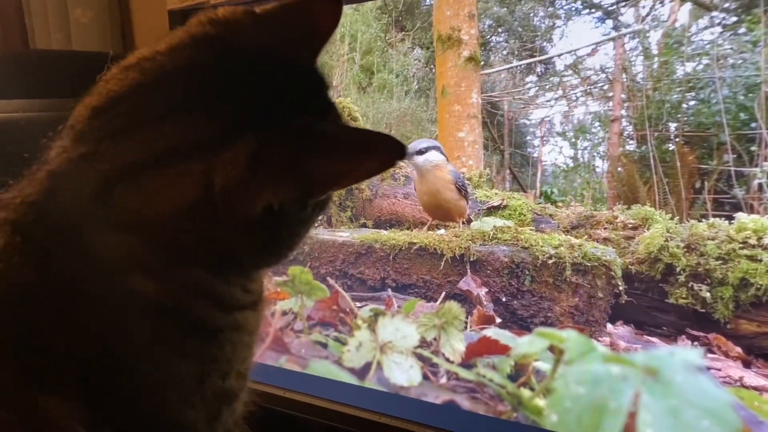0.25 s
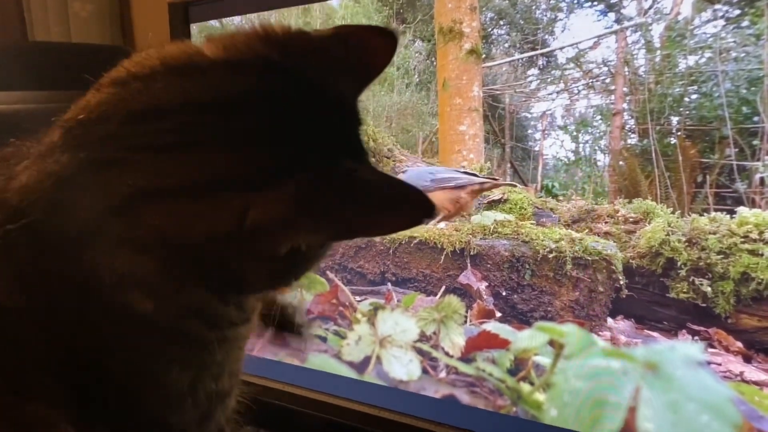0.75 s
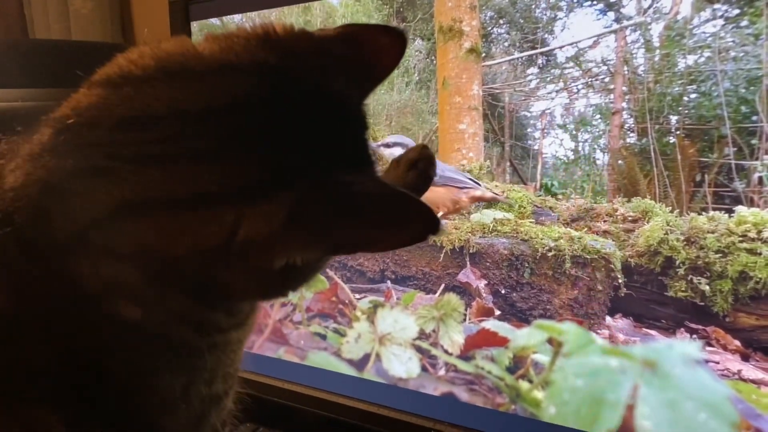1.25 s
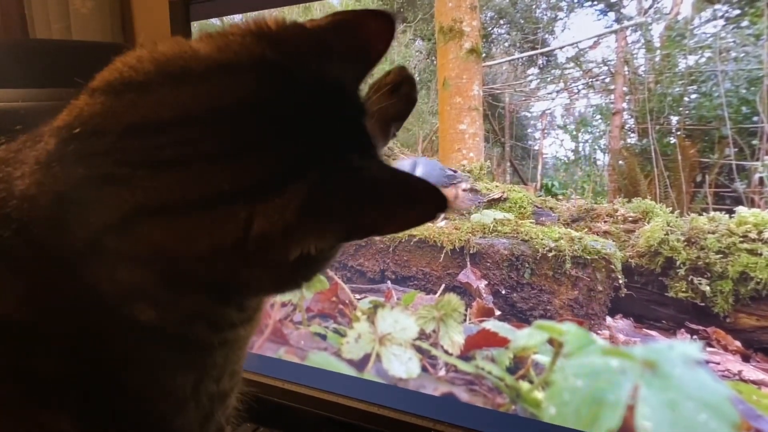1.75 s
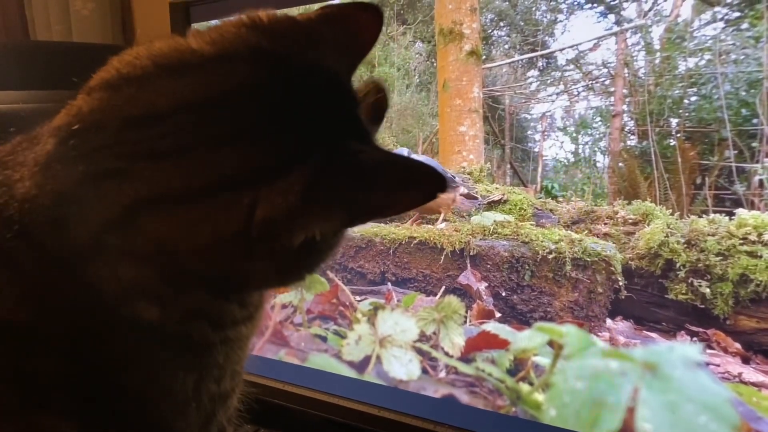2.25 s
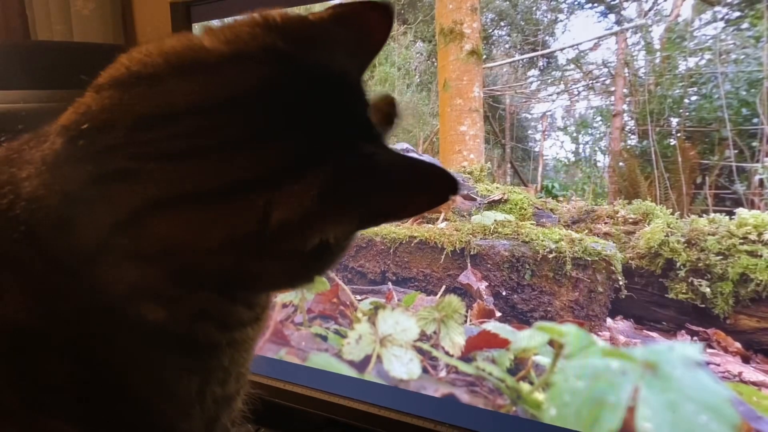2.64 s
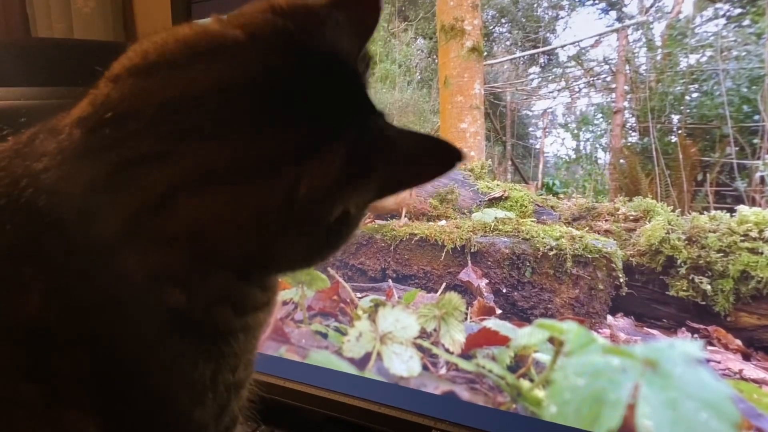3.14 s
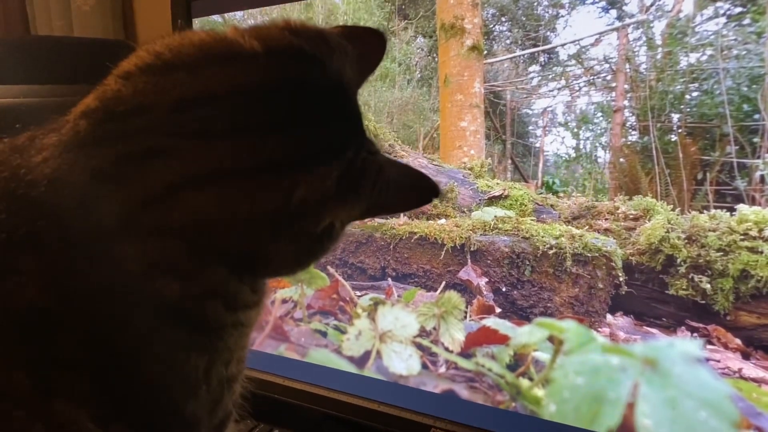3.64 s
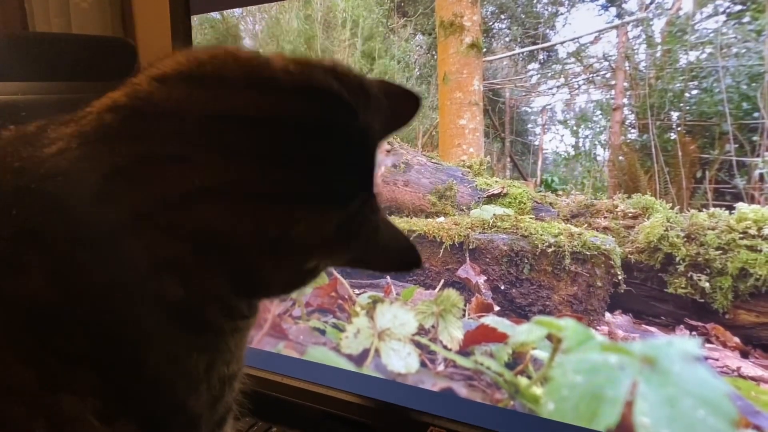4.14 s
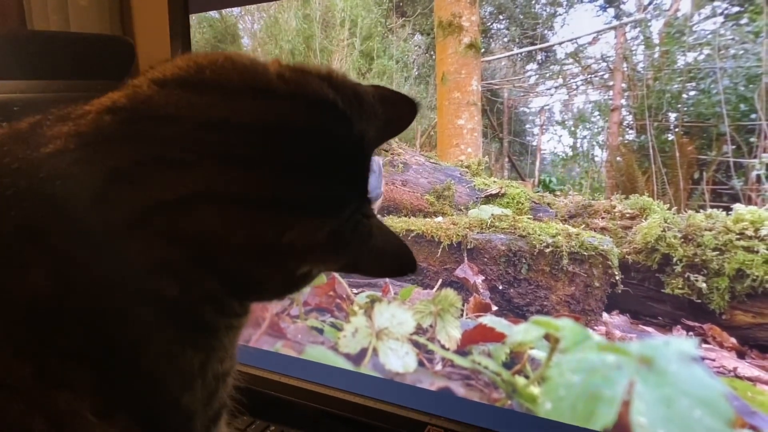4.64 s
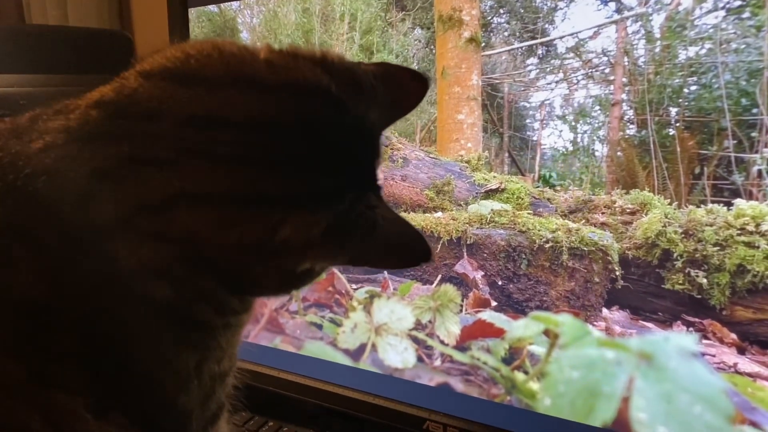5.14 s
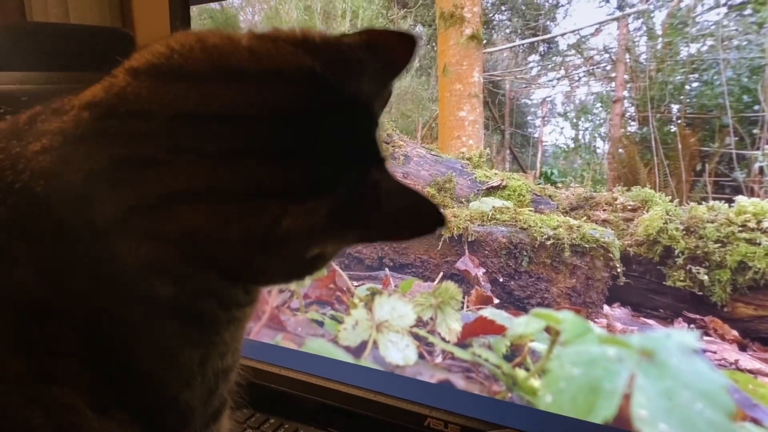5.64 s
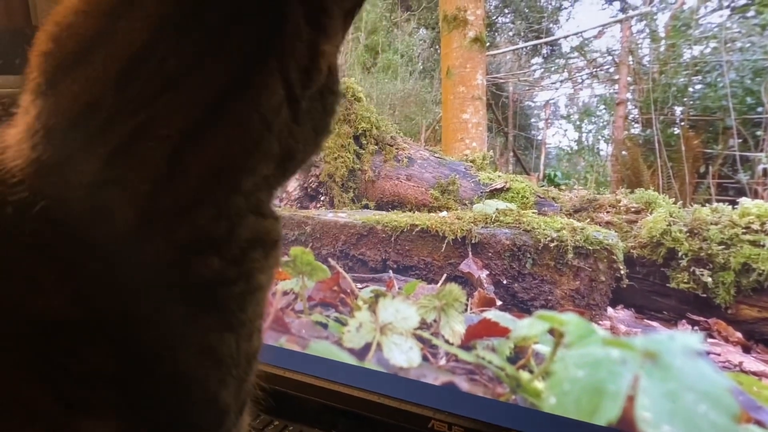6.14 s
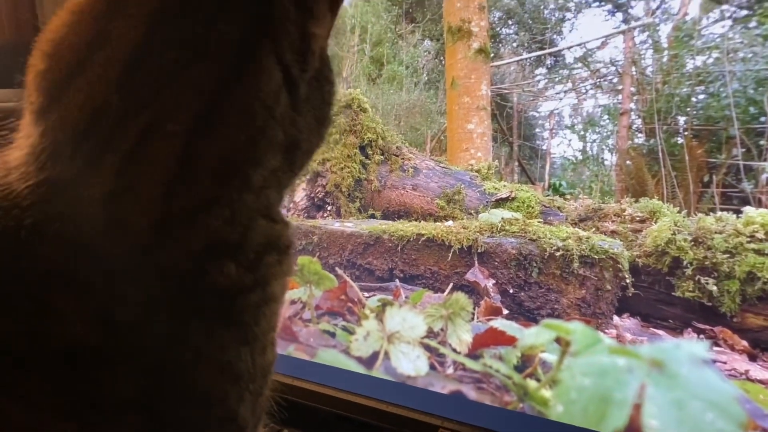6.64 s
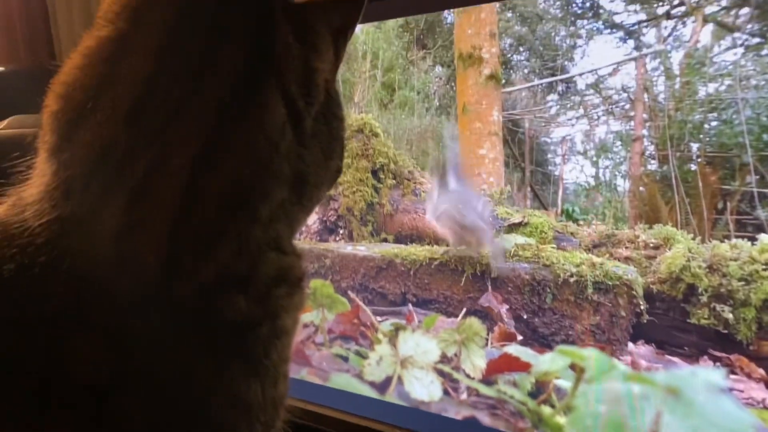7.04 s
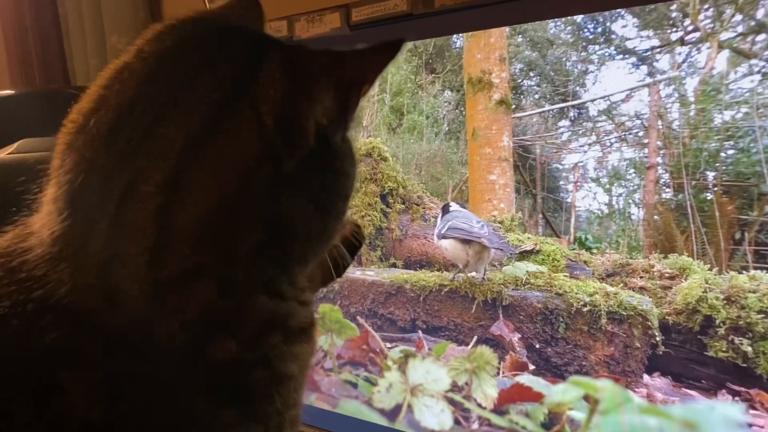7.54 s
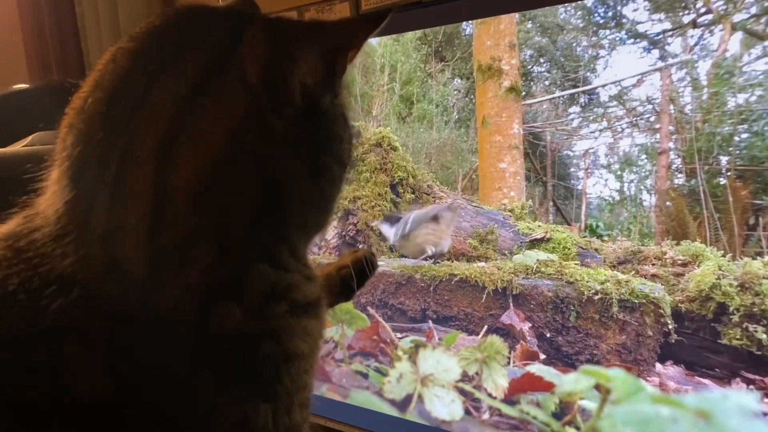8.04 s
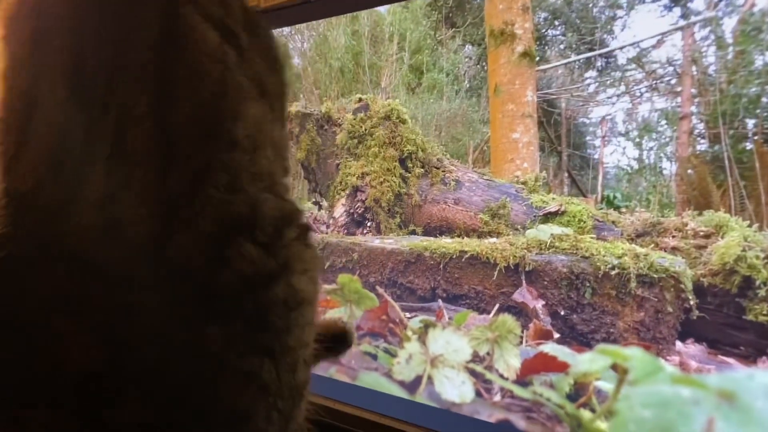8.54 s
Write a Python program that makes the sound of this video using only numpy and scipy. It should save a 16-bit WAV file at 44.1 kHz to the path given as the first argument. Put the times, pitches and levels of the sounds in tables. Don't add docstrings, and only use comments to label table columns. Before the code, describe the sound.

Paw taps click on a screen over low room hum and soft garden hiss, then bird knocks, fluttering wings, low bumps and thin chirps.

```python
import sys
import numpy as np
from scipy import signal
from scipy.fft import rfft, irfft, next_fast_len
from scipy.io import wavfile
from scipy.ndimage import uniform_filter1d

SR = 44100
rng = np.random.default_rng(int(sys.argv[2]) if len(sys.argv) > 2 else 0)


def amplitude_ratio(level_db):
    exponent = np.asarray(level_db, float) / 20
    return 10 ** exponent


def store_pcm(level_fs):
    pcm = np.round(np.clip(level_fs, -1, 1) * 32767).astype(np.int16)
    wavfile.write(sys.argv[1], SR, np.atleast_2d(pcm).T)


N = 387286
SIZE = next_fast_len(N + SR)
HZ = np.arange(SIZE // 2 + 1) * SR / SIZE + 1e-3
TIME = np.arange(N) / SR


def on_hz(table, column):
    table = np.array(table, float)
    return np.interp(np.log(HZ), np.log(table[:, 0]), table[:, column])


def on_time(table, column):
    table = np.array(table, float)
    return np.interp(TIME, table[:, 0], table[:, column])


def shape(x, gain):
    return irfft(rfft(x, SIZE) * gain, SIZE)[..., :N]


def band(lo_hz, hi_hz, order=2):
    low_cut = 1 + (lo_hz / HZ) ** (2 * order)
    high_cut = 1 + (HZ / hi_hz) ** (2 * order)
    return 1 / np.sqrt(low_cut * high_cut)


def mode(hz, width):
    return 1j * HZ * width / (hz ** 2 - HZ ** 2 + 1j * HZ * width)


def hiss(gain, channels=1):
    x = shape(rng.standard_normal((channels, N)), gain)
    return x / x.std()


def walk(rate):
    k = int(SR / rate)
    levels = np.repeat(rng.standard_normal(N // k + 1), k)
    return 1.1 * uniform_filter1d(uniform_filter1d(levels, k), k)[:N]


def add(out, s, x):
    i = int(s * SR)
    out[i:i + len(x)] += x[:N - i]


def ring(x, hz, width):
    y = signal.lfilter(*signal.iirpeak(hz, hz / width, SR), x)
    return y / np.abs(y).max()


# start_s [s], level_db [dB]
AIR_SWELL = [(0, -63), (1.27, -65), (1.51, -62.5), (1.66, -59.5), (2.1, -63.5), (3.81, -64), (4.25, -63),
             (4.6, -64), (5.43, -64), (6.14, -59), (6.31, -62), (6.8, -58), (6.94, -60.5), (7.29, -61),
             (7.8, -64), (8.46, -60.5), (8.61, -51), (8.78, -58)]
# pitch_hz [Hz], level_db [dB]
AIR_TONE = [(350, -34), (600, 1), (788, -20), (855, -5.5), (1180, -5.5), (1320, -4), (1600, 0), (1990, -5),
            (2640, -7.5), (3770, -11), (4090, -8.5), (4370, -12), (8290, -24.5), (13900, -39.5),
            (15500, -35)]


def garden_air():
    out, tone = 0, amplitude_ratio(on_hz(AIR_TONE, 1))
    low_db = on_time(AIR_SWELL, 1)
    high_db = 2 + 0.8 * (low_db + 62.5)
    for hz in 640 * 2 ** np.arange(0, 4.8, .7):
        share = np.clip(np.log2(hz / 2200) / 0.25, 0, 1) * np.clip(hz / 3000, 0, 1)
        reach = np.clip(np.log2(hz / 500) / 0.74, 0, 1)
        swell_db = reach * ((1 - share) * (low_db + 67.5) + share * high_db)
        gain = tone * band(hz / 2 ** 0.5, hz * 2 ** 0.57, order=3)
        out = out + amplitude_ratio(swell_db + 4.34 * walk(8.9)) * shape(rng.standard_normal(N), gain)
    return out * amplitude_ratio(-55.5)


# pitch_hz [Hz], level_db [dB]
DRONE_TONE = [(30, -43.5), (48, -8), (62, -5.5), (88, -11.5), (105, 1), (135, -13), (200, -9), (300, -13),
              (450, -15.5), (600, -27.5), (900, -23.5)]
# pitch_hz [Hz], width_hz [Hz], level_db [dB]
ROOM_MODES = [(62.7, 3.6, -1), (120.3, 5.43, 9), (160, 3.5, -14), (186, 9.8, -9.5), (225.15, 6.1, 4.5),
              (249.5, 9.7, -4.5), (275.4, 6.4, -7.5), (333.7, 24, -14), (411, 41, -15), (473, 69, -21.5),
              (48, 12, -13), (152.8, 15, -10.5)]


def house_drone():
    modes = sum(amplitude_ratio(db) * np.abs(mode(hz, width)) for hz, width, db in ROOM_MODES[:5])
    tone = amplitude_ratio(on_hz(DRONE_TONE, 1)) * (1 + 1.9 * modes)
    return amplitude_ratio(-50.5) * hiss(tone * band(27, 790, order=3), channels=2)


# pitch_hz [Hz], level_db [dB rms]
HUM = [(120, -46), (360, -72), (480, -73), (600, -77), (632, -80), (720, -78), (790, -83)]


def mains_hum():
    return sum(amplitude_ratio(db + 3.0) * np.sin(2 * np.pi * (hz * TIME + rng.random())) for hz, db in HUM)


def room(x):
    t, t60_s, treble_t60_s = TIME[:SR // 2], 0.46, .13
    low, high = rng.standard_normal((2, 2, len(t))) * (t > .003)
    low = signal.lfilter(*signal.butter(3, 3600, fs=SR), low) * np.exp(-np.log(1000) * t / t60_s)
    high = signal.lfilter(*signal.butter(1, 2500, "high", fs=SR), high)
    high = high * np.exp(-np.log(1000) * t / treble_t60_s)
    tails = 1.37 * low + high
    return signal.fftconvolve(x[None], tails / np.sqrt(np.sum(tails[0] ** 2)), axes=1)[:, :N]


def splinter(t, rise_s):
    x = 0.52 * rng.standard_normal(len(t)) * (t / rise_s) * np.exp(1 - t / rise_s)
    x[int(.6 * rise_s * SR)] += .7
    x[int(2.4 * rise_s * SR)] -= 2.5
    return x


def knocks(rows, rattle_db, rise_s, tone_db, modes=()):
    out, t, echo_s = np.zeros(N), TIME[:SR // 3], 0.02
    for s, db, hz, ring_db, treble_db in rows:
        echo_db = rattle_db - 1.4 * max(ring_db, 0)
        blow, noise = splinter(t, rise_s), rng.standard_normal((2, len(t)))
        body = amplitude_ratio(ring_db) * ring(blow, hz, 290)
        body += ring(ring(blow, 2380, 4400), 2500, 4500)
        body += amplitude_ratio(-18) * ring(blow, 590, 140)
        spots = rng.standard_normal(len(modes))
        for (mode_hz, width, mode_db), spot in zip(modes, spots):
            body += amplitude_ratio(-3 + mode_db + 1.5 * spot) * ring(blow, mode_hz, width)
        crack = amplitude_ratio(treble_db) * ring(ring(blow, 7100, 7000), 7400, 9000)
        smear = (t / echo_s) * np.exp(-(t / echo_s) ** 1.08)
        echo = amplitude_ratio(min(ring_db, -3.5)) * ring(noise[0] * smear, hz, 750)
        echo += ring(noise[1] * smear, 2900, 4000)
        add(out, s - .0007, amplitude_ratio(db) * (body + crack + amplitude_ratio(echo_db) * echo))
    return shape(out, amplitude_ratio(tone_db) * band(480, 15000))


# start_s [s], level_db [dB peak], pitch_hz [Hz], ring_db [dB], treble_db [dB]
BLOWS = [(.8834, -37, 1100, -4, -9), (.8853, -34.5, 2900, -2, -8), (1.4893, -30, 2300, -8, -2),
         (1.493, -38, 3700, -3, -6), (2.018, -52.5, 2000, -1, -22), (2.3082, -42, 1300, 2, -10),
         (2.3099, -39, 1380, 0, -8), (2.3148, -39, 1320, 2, -10), (2.3172, -44, 1900, 0, -12),
         (2.811, -34, 2050, -6, -10), (2.8148, -37.5, 1240, -4, -10), (3.437, -48, 2090, -5, -15),
         (4.104, -43, 1200, 8, -18), (4.113, -52, 1050, 12, -24), (5.445, -35.5, 2260, -18.5, 3),
         (5.462, -28, 2020, -3, -18), (5.881, -46, 2800, -20, -18), (7.45, -61, 1590, 11, -18),
         (8.722, -38, 2800, 9.5, 7), (8.755, -53, 2800, 20, -20)]
PAW_UNTIL_S = 3
# pitch_hz [Hz], level_db [dB]
PAW_TONE = [(260, -12), (450, 0), (1130, 4), (1600, 0), (2000, 2), (2800, 0), (4150, -1), (5100, -6),
            (8320, -5), (10700, -13), (12200, -27), (14200, -9), (15500, -20)]
# pitch_hz [Hz], width_hz [Hz], level_db [dB]
SCREEN_MODES = [(1230, 194, -3.5), (1650, 250, -11.5), (2050, 150, -8), (2500, 250, -6), (2880, 400, -5),
                (3900, 320, -5.5), (4350, 350, -9.5), (5400, 400, -16)]


def paw_taps():
    pan_db, lag_s, room_db = -2.5, -0.00007, -11.5
    rows = [row for row in BLOWS if row[0] < PAW_UNTIL_S]
    taps = knocks(rows, -13, 0.000399, on_hz(PAW_TONE, 1), SCREEN_MODES)
    lean = amplitude_ratio(pan_db / 2) * np.exp(-1j * np.pi * HZ * lag_s)
    return shape(taps + amplitude_ratio(room_db) * room(taps), np.array([lean, 1 / lean]))


# start_s [s], level_db [dB rms], pitch_hz [Hz], width_hz [Hz], length_ms [ms]
RUBS = [(0.953, -64.5, 3300, 5500, 46), (1.152, -64.5, 2400, 2500, 80), (1.69, -57.5, 2940, 3500, 140),
        (4.95, -51, 1430, 1400, 71), (5.6, -64, 5300, 6100, 20), (6.46, -57.5, 1850, 1800, 210),
        (6.53, -64, 5700, 3500, 290), (7.28, -56, 620, 200, 45), (7.44, -57, 800, 300, 50),
        (8.56, -55, 1800, 1800, 250), (8.74, -54.5, 690, 320, 63), (.957, -60, 4000, 400, 27),
        (6.5, -62.5, 3190, 400, 190), (1.6, -61, 1200, 770, 63), (4.112, -59.5, 1600, 1500, 110),
        (1.6, -57, 1000, 500, 61), (6.1, -67, 5370, 2500, 180), (7.15, -60.5, 1670, 500, 330),
        (7.75, -64.5, 630, 270, 420), (8.56, -76, 13800, 2000, 230), (8.02, -80, 13800, 2000, 170),
        (1.5, -63, 6400, 4900, 70)]


def rubs():
    out = np.zeros(N)
    for s, db, hz, width, ms in RUBS:
        u = TIME[:SR // 2] / (ms / 1000)
        swish = ring(ring(rng.standard_normal(len(u)), hz, width), hz, width)
        add(out, s, amplitude_ratio(db) * swish / swish.std() * np.minimum(u / 0.38, 1) * np.exp(-u ** 3))
    return out * amplitude_ratio(3.0 * walk(150))


# start_s [s], level_db [dB peak], pitch_hz [Hz]
TICKS = [(1.7463, -48.5, 3080), (1.8016, -49.5, 4730), (1.8552, -45, 5050), (1.91, -50.5, 4710),
         (1.966, -43.5, 5240), (3.705, -54.5, 3300), (3.828, -49.5, 3540), (3.928, -50, 5000),
         (4.035, -50, 3300), (7.9975, -54, 4800), (4.6565, -54, 3510)]


def ticks():
    out, t = np.zeros(N), TIME[:SR // 20]
    for s, db, hz in TICKS:
        blow = splinter(t, .001)
        click = 0.66 * ring(ring(blow, hz, 1400), hz, 1400) + ring(ring(blow, 5000, 4000), 5000, 4000)
        add(out, s - .001, amplitude_ratio(db) * click)
    return out


# pitch_hz [Hz], level_db [dB]
BEAK_TONE = [(260, -34), (450, 3), (1130, 21.5), (1620, 1.5), (2100, 8.5), (2740, 7), (4150, -13),
             (5100, -19), (8320, -7), (10700, -39), (12200, -66), (14200, -23), (15500, -57)]


def beak_knocks():
    rows = [row for row in BLOWS if row[0] > PAW_UNTIL_S]
    return knocks(rows, -8.5, .0013, 0.48 * on_hz(BEAK_TONE, 1))


# start_s [s], pitch_hz [Hz], level_db [dB]
WHISTLES = [
    [(4.28, 4130, -74), (4.37, 3890, -72), (4.5, 4080, -70)],
    [(8.32, 4080, -69), (8.4, 4020, -59), (8.42, 4010, -64), (8.45, 4010, -59), (8.5, 3940, -64),
     (8.56, 4180, -72)],
]


def far_whistles():
    out = np.zeros(N)
    for rows in WHISTLES:
        edge = np.clip(np.minimum(TIME - rows[0][0], rows[-1][0] - TIME) / 0.019, 0, 1)
        turn = 2 * np.pi * np.cumsum(on_time(rows, 1)) / SR
        blurred = walk(260) * np.sin(turn) + walk(260) * np.cos(turn)
        out += edge * amplitude_ratio(on_time(rows, 2) - 2.5) * blurred
    return out


# start_s [s], push_s [s], level_db [dB], deep_db [dB], thud_db [dB]
LOW_SWELLS = [(5.089, 0.039, -45.5, -5.5, -11.5), (5.36, .05, -43, -15.5, -21), (5.459, 0.19, -36.5, 2, 3),
              (5.67, 0.093, -38.5, -5, -5), (5.82, 0.035, -37.5, -11, -9.5), (6.009, 0.044, -45.5, -11.5, -19),
              (6.31, 0.038, -44, -6.5, -11), (6.58, 0.036, -47.5, -16.5, -8.5), (6.771, 0.078, -44, -5.5, -1.5),
              (6.84, 0.087, -38.5, -6, 2), (6.93, 0.027, -33.5, -5, -19), (7.049, 0.051, -46.5, 1.5, -17.5),
              (7.139, 0.024, -31, -14, -35.5), (7.249, 0.034, -45.5, -5.5, -26), (7.36, 0.48, -50, -15.5, -26),
              (8.0, 0.11, -47, 0, 9), (8.13, 0.18, -48, 3, 2.5), (8.53, 0.21, -46, 0, -4)]


def swell(k):
    t, attack_s = TIME[::50], 0.042
    fade_db_per_s = (170, 300, 180, 300)[k]
    unrest_db = (-65, -59, -68, -70)[k]
    out = amplitude_ratio(unrest_db) * np.clip((t - LOW_SWELLS[0][0]) / attack_s, 0, 1)
    for s, push, db, deep_db, thud_db in LOW_SWELLS:
        rise = np.clip((t - s) / attack_s, 0, 1)
        range_db = (deep_db, 0, thud_db, thud_db - 8.5)[k]
        out = out + rise * amplitude_ratio(db + range_db - fade_db_per_s * np.clip(t - s - push, 0, 2))
    return np.interp(TIME, t, out)


def rumble(beat_db):
    modes = sum((-1) ** k * amplitude_ratio(db) * mode(hz, width) for k, (hz, width, db) in enumerate(ROOM_MODES))
    push = rng.standard_normal(N)
    for s, db, *_ in STROKES:
        pulse = amplitude_ratio(beat_db + .6 * (db + 33.5))
        add(push, s + 0.00799, np.array([pulse]))
        add(push, s + 0.00801 + .0212, np.array([-pulse * amplitude_ratio(-4)]))
    out = 0
    for k, (lo_hz, hi_hz) in enumerate([(38, 105), (90, 115), (145, 277), (290, 570)]):
        gain = modes * band(lo_hz, hi_hz, order=4)
        wave = shape(push, gain) / np.sqrt(np.mean(np.abs(gain) ** 2))
        even = wave / (uniform_filter1d(wave ** 2, SR // 14) + .05) ** .42
        out = out + swell(k) * even
    return shape(out, amplitude_ratio(-2.0) * band(41, 900, order=4))


# start_s [s], level_db [dB peak], body_db [dB], pitch_hz [Hz] of the feathers, whistle_db [dB]
STROKES = [(5.482, -35, -4.5, 4600, -5.5), (5.5225, -32, -7, 4700, -3), (5.568, -30.5, -11, 4300, -6),
           (5.61, -35, -10.5, 4100, -5), (5.655, -45, -13, 4000, -9), (5.702, -46, -14, 4000, -3),
           (5.75, -49.5, -14, 3820, -6), (5.795, -55, -18, 4900, -5), (5.843, -56.5, -20, 4900, -7),
           (6.7388, -48.5, -12, 4140, -5), (6.7766, -42.5, -10, 4370, -3), (6.8131, -39.5, -3, 4100, -3),
           (6.8456, -34.5, -2.5, 4300, -5), (6.879, -38, -3.5, 4560, -5.5), (6.9117, -41.5, -2, 4570, -7.5),
           (7.9966, -47, -1, 4800, -12), (8.0312, -44.5, 2, 4900, -4.5), (8.0594, -47.5, -4.5, 5010, -1.5),
           (8.0967, -47.5, 0, 5000, 2), (8.132, -49, -3.5, 4800, 2), (8.1665, -50.5, -6, 4930, -3),
           (8.2014, -54, -5, 4800, 1), (8.2353, -53.5, -6, 4550, 1), (8.271, -53, -8, 4970, -3),
           (8.3087, -52.5, -9, 4400, -4), (8.4705, -52, -25, 6000, -7), (8.5525, -46.5, -6, 4800, -8),
           (8.609, -44.5, -3, 4200, -10)]
# pitch_hz [Hz], level_db [dB]
WING_TONE = [(350, -41), (600, -1), (766, -1), (1470, 4), (1620, 6.5), (3030, -6.5), (3330, -3.5),
             (4810, -5), (7740, -13), (8520, -23), (10700, -25), (11500, -25), (12000, -48), (13500, -22),
             (15500, -28)]


def wings():
    top, body, sing, t = np.zeros(N), np.zeros(N), np.zeros(N), TIME[:SR // 8]
    times = [row[0] for row in STROKES]
    for (s, db, body_db, hz, sing_db), beat in zip(STROKES, np.diff(times + [N / SR])):
        hold = .54 * min(beat, 0.04)
        downstroke, upstroke = np.exp(-(t / hold) ** 4), amplitude_ratio(-6) * np.exp(-t / 0.042)
        stroke = np.minimum(t / .0055, 1) * (downstroke + upstroke)
        note = ring(rng.standard_normal(len(t)), hz, 420)
        add(top, s - .002, amplitude_ratio(db - 13) * stroke)
        add(body, s - .002, amplitude_ratio(db + body_db - 9.5) * stroke)
        add(sing, s - .002, amplitude_ratio(db + sing_db - 15.5) * stroke * note / note.std())
    tone = amplitude_ratio(on_hz(WING_TONE, 1))
    feathers = amplitude_ratio(3.45 * walk(400))
    treble = top * hiss(tone * band(3300, 20000))[0]
    puff = body * hiss(tone * band(630, 3000))[0]
    return (treble + puff + sing) * feathers


# start_s [s], level_db [dB peak], pitch_hz [Hz] at first, top_hz [Hz], length_ms [ms]
CHIRPS = [
    (5.686, -39, 6100, 7980, 26),
    (5.875, -44.5, 7340, 7960, 22),
    (6.048, -54.5, 5870, 8000, 34),
    (6.46, -58, 7060, 7900, 32),
    (8.579, -31, 6660, 7490, 13),
]


def chirps():
    out = np.zeros(N)
    for s, db, first_hz, top_hz, ms in CHIRPS:
        last_hz = top_hz + 110 - 110 * max(ms - 25, 0)
        u = np.linspace(0, 1, int(ms * SR / 1000))
        hz = first_hz + (top_hz - first_hz) * np.sin(np.pi / 2 * np.minimum(u / 0.515, 1))
        hz = hz + (last_hz - top_hz) * u ** 3
        add(out, s, amplitude_ratio(db) * np.sin(np.pi * u ** .55) * np.sin(2 * np.pi * np.cumsum(hz) / SR))
    return out


# pitch_hz [Hz], width_hz [Hz], level_db [dB]
SPEAKER_PEAKS = [(1641, 49, -0.5), (2800, 550, -4.5), (3335, 95, -4), (4026, 80, -6), (4860, 270, -5.5),
                 (5680, 210, -3)]


def loudspeaker(x):
    peaks = sum(amplitude_ratio(db) * mode(hz, width) for hz, width, db in SPEAKER_PEAKS)
    return shape(x, amplitude_ratio(-2.5) * (1 + peaks))


# pitch_hz [Hz], level_db [dB, left minus right], lag_rad [rad, left], likeness [0-1]
PORTS = [(50, -1.4, 0, .97), (80, -1.7, 0, .97), (118, -4.4, .07, 1), (170, -2.6, .12, .72),
         (235, -3.5, .22, .74), (406, -3.5, 1.4, 0.24), (885, -4, 2.5, 0.02), (1300, -4, 1.2, 0.87),
         (2000, 3.5, 4, 0.48), (2700, 2, 4, 0.45), (3500, 1, 6, 0), (4600, 6, 7, 0.6), (6600, 4.5, -1, 0.2),
         (8850, -7.5, 3, 0.4), (10080, -0.5, 6.5, 0.88), (11400, -0.5, 8, .97), (12100, 1, 10, 0.78),
         (13300, 0.5, 14, 0.9)]


def ports(sound):
    like = np.clip(on_hz(PORTS, 3), 0, 1)
    lean = amplitude_ratio(on_hz(PORTS, 1) / 2) * np.exp(-.5j * on_hz(PORTS, 2))
    same, other = (rfft(v, SIZE) for v in sound)
    apart = np.sqrt((1 - like) / 2) * other
    same = np.sqrt((1 + like) / 2) * same
    return irfft(np.array([(same + apart) * lean, (same - apart) / lean]), SIZE)[:, :N]


def scene():
    spread = loudspeaker(np.array([wings() + rubs() + garden_air() for _ in range(2)]))
    pecks, calls = loudspeaker(np.array([beak_knocks(), ticks() + chirps() + far_whistles()]))
    speaker = pecks + calls
    near = np.array([speaker + mains_hum(), 0.46 * speaker])
    tail = amplitude_ratio(-8.5) * room(amplitude_ratio(-11) * pecks + calls + 0.91 * spread[0])
    house = ports(near + spread + tail + house_drone())
    beat_db = 39
    shake = ports(np.array([rumble(beat_db), rumble(beat_db - 12)]))
    middle = shake.mean(axis=0)
    shake = middle + 0.8 * (shake - middle)
    return paw_taps() + house + shake


def low_pass(x):
    return signal.sosfilt(signal.butter(12, 15830, fs=SR, output="sos"), x)


def record(dry):
    top = signal.ellip(8, .2, 70, 15600, fs=SR, output="sos")
    return low_pass(signal.sosfilt(top, dry))


dry = scene()
out = record(dry)
store_pcm(out)
```